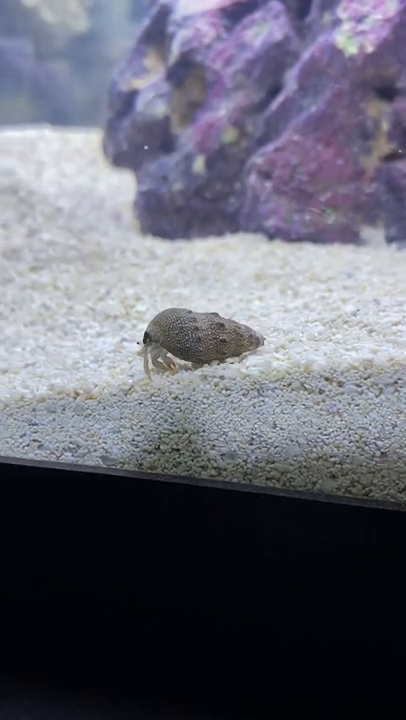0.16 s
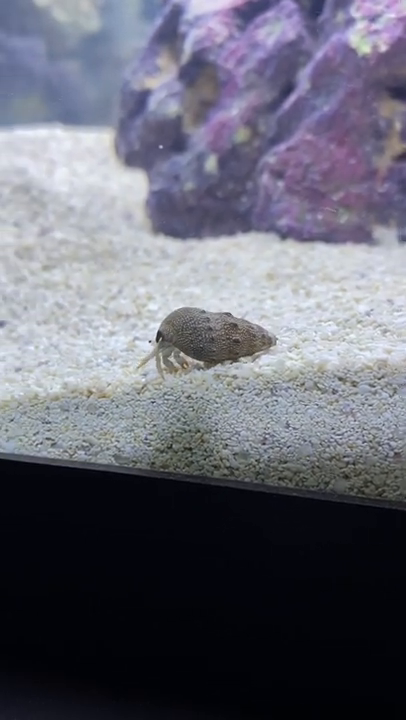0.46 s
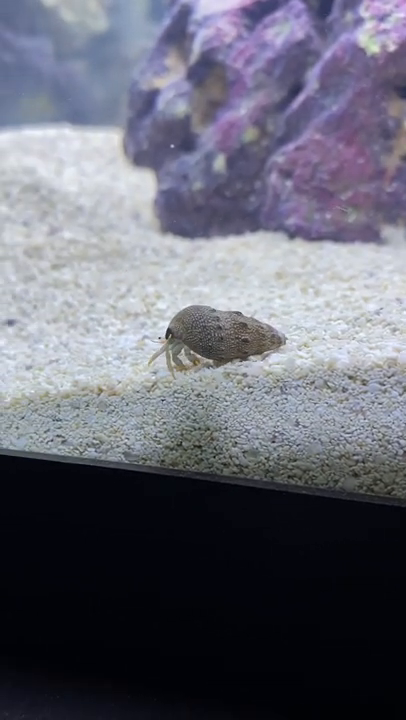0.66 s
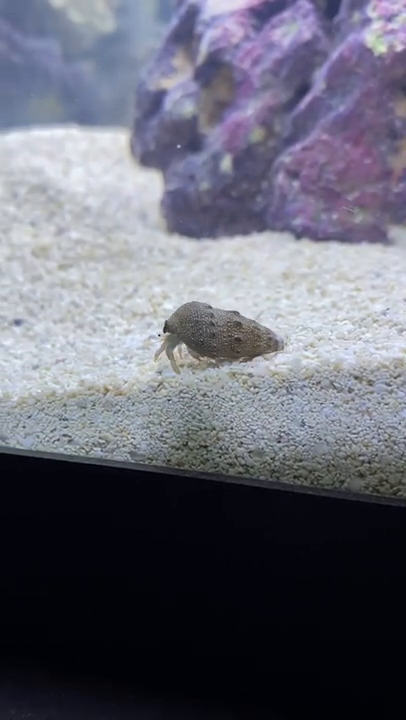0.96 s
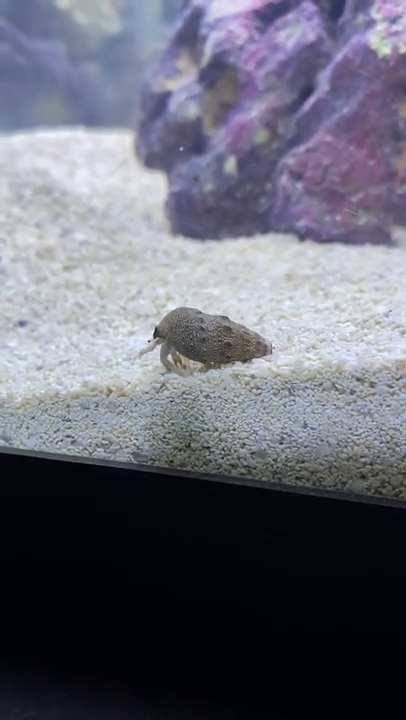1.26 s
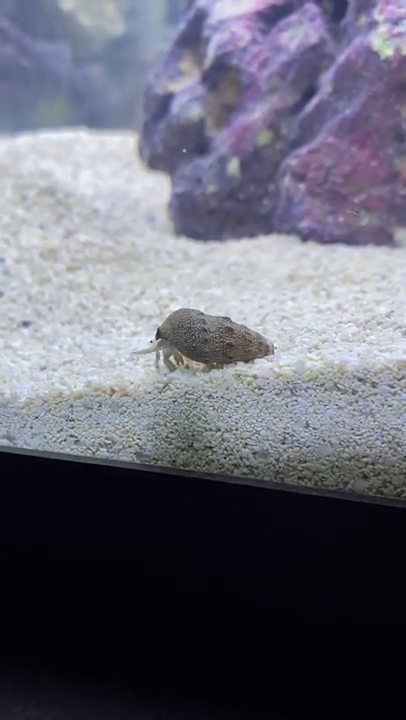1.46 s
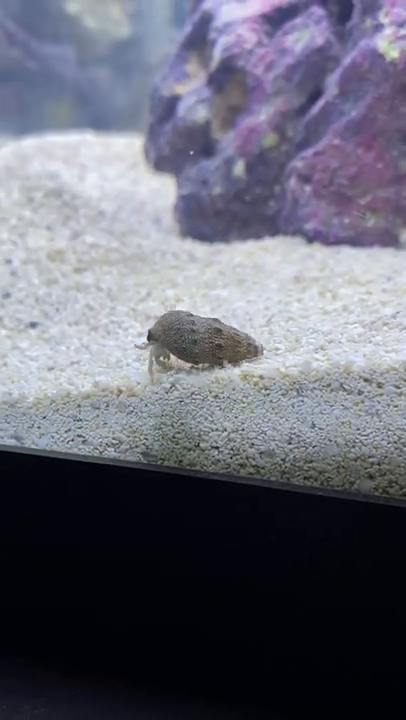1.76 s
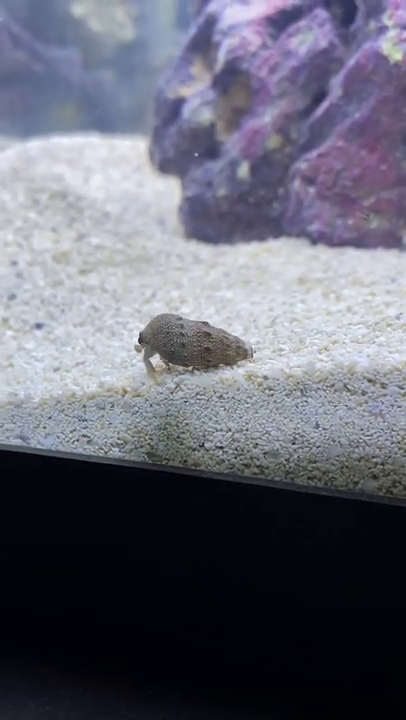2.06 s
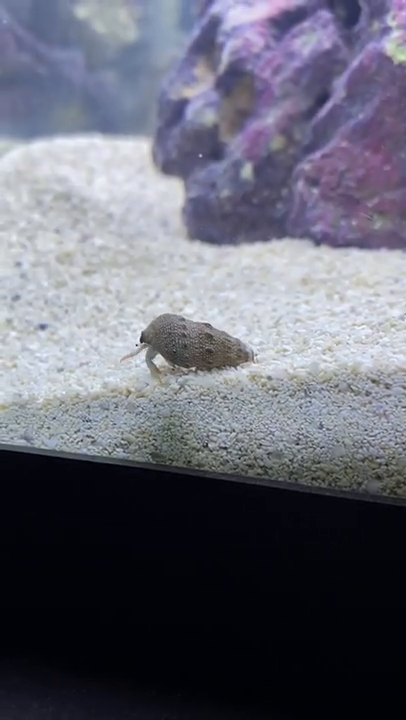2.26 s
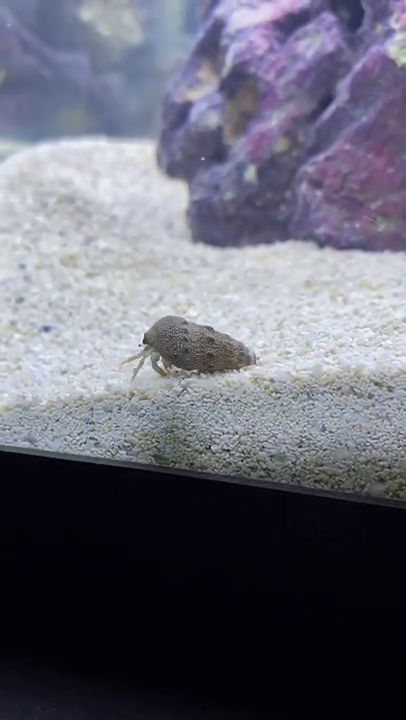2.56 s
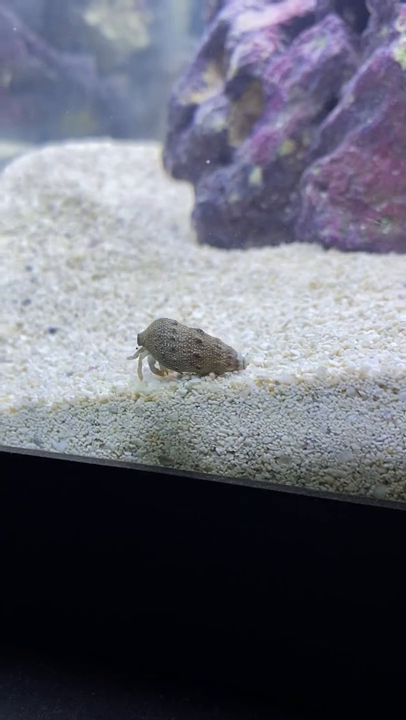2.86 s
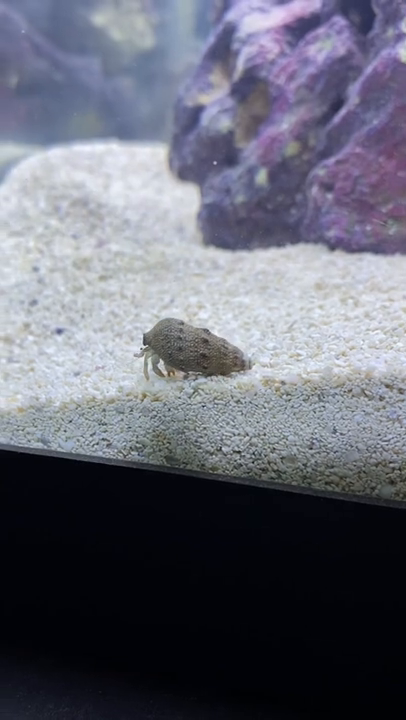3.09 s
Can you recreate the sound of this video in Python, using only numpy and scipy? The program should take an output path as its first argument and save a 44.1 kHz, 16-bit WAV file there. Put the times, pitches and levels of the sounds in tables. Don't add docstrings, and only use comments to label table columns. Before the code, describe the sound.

A steady low aquarium pump hum with soft rattling, bright ticks and faint water rush

```python
import sys
import numpy as np
from scipy import signal
from scipy.fft import rfft, irfft
from scipy.io import wavfile
from scipy.ndimage import uniform_filter1d

SR = 44100
rng = np.random.default_rng(int(sys.argv[2]) if len(sys.argv) > 2 else 0)


def field_ratio(decibels):
    return 10 ** (np.asarray(decibels, dtype=float) / 20)


def file_out(sig):
    cols = np.atleast_2d(sig).T
    lim = np.clip(cols, -1, 1)
    pcm = np.round(lim * 32767).astype(np.int16)
    wavfile.write(sys.argv[1], SR, pcm)


N = 142443
TURN_HZ = 60


def evened(x):
    return x / np.sqrt(np.mean(x ** 2) + 1e-20)


def read(points, hz):
    f, value = np.transpose(points)
    return np.interp(np.log(hz + 1), np.log(f + 1), value)


def drift(top_hz, t):
    rates_hz = np.geomspace(.3, top_hz, 20)
    return evened(sum(np.sin(2 * np.pi * (f * t + rng.random())) / np.sqrt(f) for f in rates_hz))


def wash(colour, patchy_db, swell_db, edge_hz, fall_db):
    # frequency in Hz, left-right likeness.
    likeness = [(100, 0.99), (270, 0.94), (450, .7), (1200, 0.25), (2400, 0.6), (4000, 0.35), (9000, 1),
                (15000, 0.44)]
    # resonance in Hz, width in Hz, lift in dB.
    cabinet = [(152, 14, 3.5), (290, 14, 2), (214, 39, 2), (450, 32, 2.5), (614, 9.9, 5), (630, 5.3, 0.5),
               (983, 24, 6.5), (2120, 65, -1.5)]
    size, hop = 2048, 512
    frames, hz = N // hop + 5, np.fft.rfftfreq(size, 1 / SR)
    a, b, c, d, patches = rng.standard_normal((frames, size // 2 + 1, 5)).T
    patches = uniform_filter1d(patches, size=12, axis=0)
    patches = evened(uniform_filter1d(patches, size=4, axis=1))

    same = np.clip(read(likeness, hz), -1, 1)[:, None]
    left = a + 1j * b
    right = same * left + np.sqrt(1 - same ** 2) * (c + 1j * d)

    octaves_outside = abs(np.log2((hz + 1) / np.clip(hz + 1, *edge_hz)))
    shape_db = read(colour, hz) - fall_db * octaves_outside
    for mode_hz, width_hz, lift_db in cabinet:
        shape_db += lift_db * np.exp(-((hz - mode_hz) / width_hz) ** 2)
    swell = swell_db * drift(8, np.arange(frames) * hop / SR)
    z = np.array([left, right]) * field_ratio(shape_db[:, None] + patchy_db * patches + swell)
    return evened(signal.istft(z, nperseg=size, noverlap=size - hop)[1][:, :N])


def cabinet_rumble():
    # frequency in Hz, level in dB.
    rumble_colour = [(20, -18.5), (40, 0.5), (58, -4.5), (75, -4), (150, -8.5), (200, -14.5), (275, -9),
                     (400, -21)]
    level_db, low_cut_hz = -54.5, 45
    rumble = wash(rumble_colour, patchy_db=0.5, swell_db=1.26, edge_hz=(20, 400), fall_db=35)
    high_pass = signal.butter(4, low_cut_hz, "high", fs=SR, output="sos")
    return signal.sosfilt(high_pass, field_ratio(level_db) * rumble)


def water_rush():
    # frequency in Hz, level in dB.
    rush_colour = [(300, -4), (450, 2.14), (1050, -10), (1300, -20), (2600, -17), (2900, -27.5),
                   (4000, -32.5), (12000, -43)]
    level_db = -63
    return field_ratio(level_db) * wash(rush_colour, patchy_db=1.87, swell_db=0.0, edge_hz=(300, 12500), fall_db=18.5)


def bubbles():
    # start in seconds, level in dB, pitch in Hz, length in seconds.
    clusters = [
        (.94, -83, 6200, 0.084),
        (2.465, -77.5, 6000, 0.012),
        (2.492, -85, 6260, .01),
    ]
    out = np.zeros(N)
    for start_s, level_db, hz, length_s in clusters:
        t, at = np.arange(0, length_s, 1 / SR), round(start_s * SR)
        grain = evened(uniform_filter1d(rng.standard_normal((2, len(t))), size=80, axis=1))
        fizz = grain[0] * np.sin(2 * np.pi * hz * t) + grain[1] * np.cos(2 * np.pi * hz * t)
        swell = np.sin(np.pi * (t / length_s) ** 0.33)
        out[at:at + len(t)] += field_ratio(level_db) * swell * fizz
    return out


def hum():
    # multiple of the turn rate, rms level in dB, phase in radians.
    partials = [(1, -61, 2.7), (2, -45.4, -2.25), (3, -77, -1.5), (4, -70.6, .86)]
    waver_db, wander_rad = 0.77, 0.043
    t = np.arange(N) / SR
    waver = field_ratio(waver_db * drift(7.9, t))
    wander = wander_rad * drift(3.7, t)
    out = np.zeros(N)
    for multiple, level_db, phase_rad in partials:
        phase = 2 * np.pi * multiple * TURN_HZ * t + phase_rad + wander
        out += np.sqrt(2) * field_ratio(level_db) * waver * np.cos(phase)
    return out


def looseness_db(t):
    # time in seconds, looseness in dB.
    loose = [(0, -95.5), (.18, -96), (.36, -89), (.47, -95), (.78, -96.5), (1.0, -96.5), (1.32, -97),
             (1.48, -88.5), (1.6, -98), (1.71, -87.5), (1.79, -96.5), (2.15, -94), (2.3, -94), (2.44, -91),
             (2.6, -96.5), (2.82, -100.5), (2.95, -94), (3.15, -91)]
    return np.interp(t, *np.transpose(loose))


def knocks():
    # time in seconds, strength in dB, snap against strength in dB.
    hard_knocks = [(0.0164, -63.5, -19), (0.0318, -64.5, -16), (0.3486, -71.5, -29), (0.3825, -69, -38),
                   (0.5501, -68.5, -30), (0.5661, -68, -8), (0.5836, -63.5, -12), (0.7332, -57.5, -6),
                   (0.8001, -65.5, -20), (0.85, -63.5, -13), (1.1338, -73.5, -38), (1.1508, -69, -42),
                   (1.2161, -61, -9), (1.2331, -57.5, -4), (1.7, -73, -42), (1.8337, -64.5, -15),
                   (1.8502, -63.5, -15), (1.8836, -68, -3), (1.8991, -60.5, -7), (1.916, -55.5, -6),
                   (2.0338, -61.5, -9), (2.0494, -63, -13), (2.2657, -70.5, -36), (2.3161, -67, -36),
                   (2.6838, -58.5, -11), (2.8998, -67, -19), (2.9163, -69, -10), (3.0006, -66.5, -17),
                   (3.0664, -62.5, -17), (3.1163, -69, -39)]
    soft_db, spread_db, soft_delay_s, jitter_s = 10.5, 2.5, .0003, .0004
    hard_delay_s, snap_lift_db = .0006, 12
    turns_s = np.arange(0, N / SR - .01, 1 / TURN_HZ)
    late, strong = rng.standard_normal((len(turns_s), 2)).T
    at_s = turns_s + soft_delay_s + jitter_s * late
    knock_db = soft_db + looseness_db(turns_s) + spread_db * np.clip(strong, -2, 2)
    snap_db = np.full(len(turns_s), -200.)
    for start_s, hard_db, bright_db in hard_knocks:
        i = round(start_s * TURN_HZ)
        at_s[i], knock_db[i] = start_s + hard_delay_s, hard_db
        snap_db[i] = hard_db + bright_db + snap_lift_db
    return np.round(abs(at_s) * SR).astype(int), knock_db, snap_db


def housing(at, knock_db):
    # mode in Hz, level in dB, T60 in seconds.
    modes = [(589.6, -8, 0.08), (700, -2, 0.075), (837, -7.5, 0.089), (930.1, -1, 0.088),
             (1003, -6.5, 0.063), (1160, -8.5, 0.044), (1976, -13, .03), (2161, -14, 0.049),
             (2415, -11, 0.035), (2480, -11, 0.059), (2654, -14, 0.013), (3220, -23, 0.043)]
    level_db, follow, roughness, rise_s = -67, 0.26, 0.93, 0.0024
    t, out = np.arange(4000) / SR, np.zeros((2, N))
    for hz, mode_db, t60_s in modes:
        shared, left, right = rng.standard_normal((len(at), 3)).T
        chance = shared + .5 * np.array([left, right])
        train = np.zeros((2, N))
        train[:, at] = field_ratio(follow * knock_db) * (1 + roughness * chance)
        ring = field_ratio(mode_db - 60 * t / t60_s) * np.sin(2 * np.pi * hz * t) * np.minimum(t / rise_s, 1)
        out += signal.oaconvolve(train, ring[None], axes=1)[:, :N]
    return field_ratio(level_db) * evened(out)


def puffs(at, level_db, colour, t60_s, steady=0):
    rise_s, spike_db, spike_t60_s, apart = .0007, 6, .011, .26
    train, t = np.zeros(N), np.arange(4000) / SR
    train[at] = field_ratio(level_db)
    decay = field_ratio(-60 * t / t60_s) + field_ratio(spike_db - 60 * t / spike_t60_s)
    puff = (1 - np.exp(-t / rise_s)) * decay
    shape = steady + signal.oaconvolve(train, puff)[:N]
    noise = rng.standard_normal(N) + apart * rng.standard_normal((2, N))
    gain = field_ratio(read(colour, np.fft.rfftfreq(N, 1 / SR)))
    return irfft(rfft(shape * noise) * gain, N)


def room(x):
    t60_s, gap_s = 0.22, .003
    t = np.arange(SR // 3) / SR
    shared, left, right = rng.standard_normal((3, len(t))) * field_ratio(-60 * t / t60_s) * (t > gap_s)
    tails = np.array([shared + 0.12 * left, shared + 0.12 * right])
    return signal.oaconvolve(x, tails / np.linalg.norm(tails[0]), axes=1)[:, :N]


def crack(at, knock_db, snap_db):
    # frequency in Hz, level in dB.
    crack_colour = [(1000, -1.5), (2500, 5.5), (4500, -12), (6300, -7), (8500, -0.5), (11500, 2),
                    (13500, -5), (16500, -16.5)]
    # frequency in Hz, level in dB.
    snap_colour = [(11500, -30), (13000, -8), (14000, -6), (14600, -1), (15550, .1), (15800, -10),
                   (16500, -12)]
    level_db, rub_db, tail_db, snap_tail_db = -0.5, -5, -7, -5
    rub = field_ratio(rub_db + looseness_db(np.arange(N) / SR))
    body = puffs(at, knock_db, crack_colour, t60_s=.018, steady=rub)
    snap = puffs(at, snap_db, snap_colour, t60_s=.012)
    tail = room(body + field_ratio(snap_tail_db) * snap)
    return field_ratio(level_db) * (body + snap + field_ratio(tail_db) * tail)


def ports(left, right):
    # frequency in Hz, left minus right in dB.
    tilt = [(250, -1.5), (450, 1.5), (740, 3.5), (1220, 3.5), (2010, 0), (3330, 1.1), (5500, -1)]
    # frequency in Hz, phase lead of the left in radians.
    lead = [(900, -.2), (1210, -1), (2500, 1), (5300, .4), (7200, 3.14), (10500, 6.28), (13650, 9.42),
            (16300, 12.4)]
    hz = np.fft.rfftfreq(2 * N, 1 / SR)
    half = field_ratio(read(tilt, hz) / 2) * np.exp(.5j * read(lead, hz))
    out = []
    for x, gain in ((left, half), (right, 1 / half)):
        mirrored = np.r_[x, x[::-1]]
        out.append(irfft(rfft(mirrored) * gain)[:N])
    return np.array(out)


def scene():
    bass_tilt_db = -.2
    at, knock_db, snap_db = knocks()
    bass = (hum() + cabinet_rumble()) * field_ratio([[bass_tilt_db / 2], [-bass_tilt_db / 2]])
    pair = water_rush() + bubbles() + housing(at, knock_db) + crack(at, knock_db, snap_db)
    return bass + ports(*pair)


def gate(x):
    # frequency in Hz, threshold in dB.
    threshold = [(5000, -140), (7500, -119), (10500, -120), (12300, -122), (13800, -114), (16500, -116)]
    mid_side = np.array([x[0] + x[1], x[0] - x[1]]) / 2
    hz, _, z = signal.stft(mid_side, SR, nperseg=1024, boundary="even")
    bands = (abs(z[:, :512]) ** 2).reshape(2, 32, 16, -1).mean(2)
    power = bands.repeat(16, axis=1)
    over_db = 10 * np.log10(power + 1e-30) - read(threshold, hz[:512])[:, None]
    z[:, :512] *= np.clip(over_db / 2 + .5, .03, 1)
    mid, side = signal.istft(z, SR, nperseg=1024)[1][:, :N]
    return np.array([mid + side, mid - side])


def band_limit(x):
    return signal.sosfilt(signal.butter(12, 16930, fs=SR, output="sos"), x)


def record(dry):
    edge_hz, fade_s = 16500, .004
    gated = gate(np.pad(dry, ((0, 0), (0, 1024)), "reflect"))
    low_pass = signal.firwin(511, edge_hz, window=("kaiser", 9), fs=SR)
    x = signal.oaconvolve(gated, low_pass[None], "same")
    fade = np.clip(np.arange(N)[::-1] / (fade_s * SR), 0, 1)
    return band_limit(x * fade)


dry = scene()
out = record(dry)
file_out(out)
```